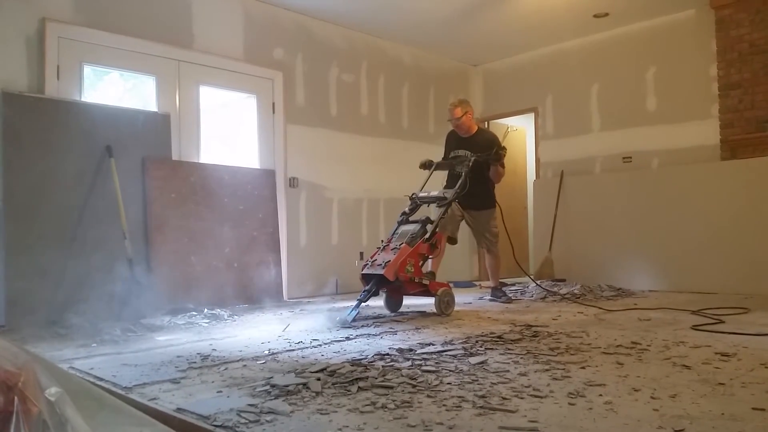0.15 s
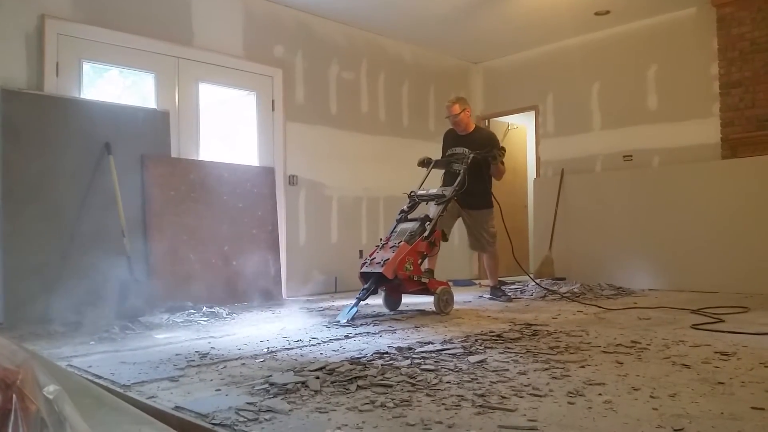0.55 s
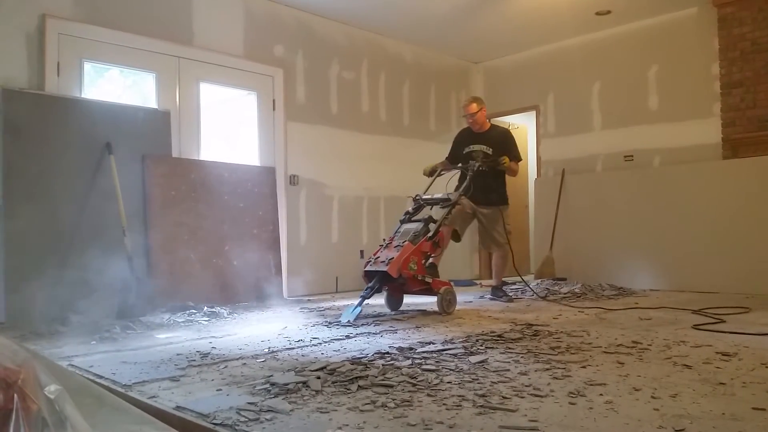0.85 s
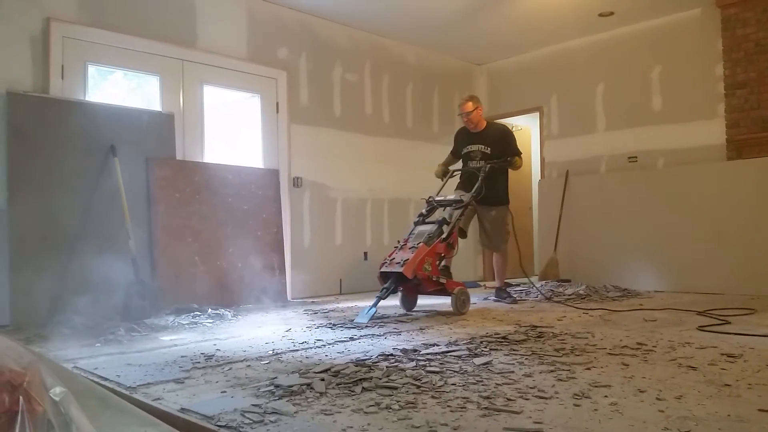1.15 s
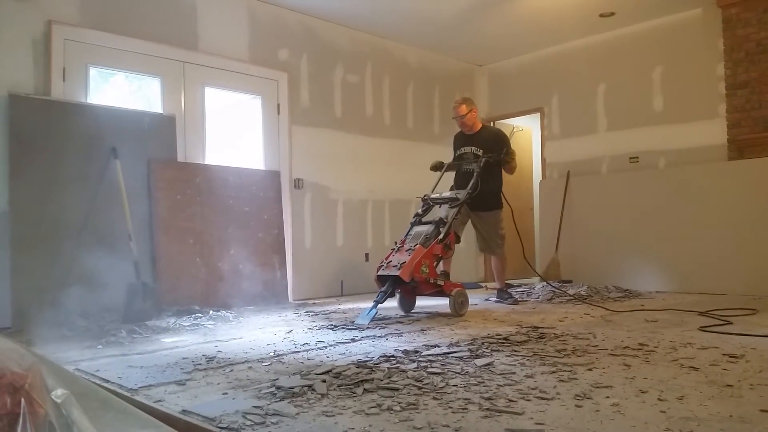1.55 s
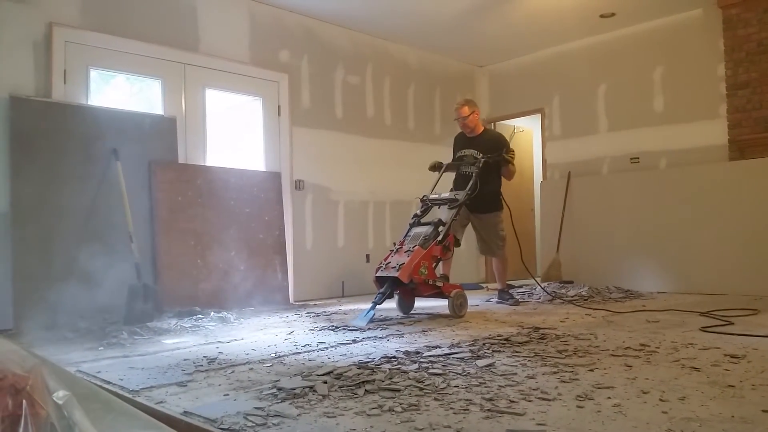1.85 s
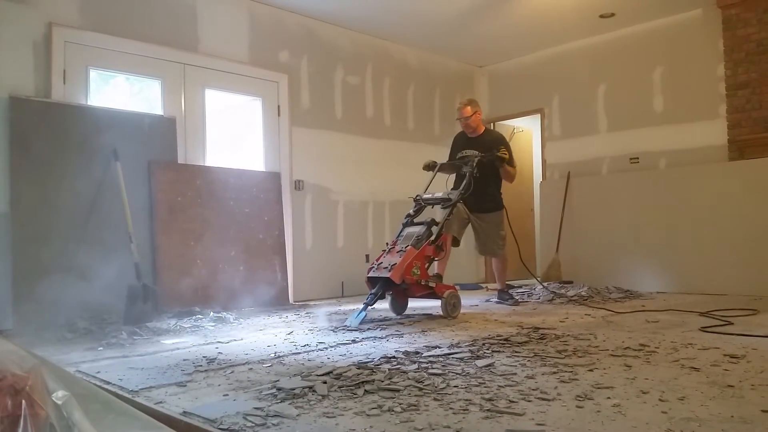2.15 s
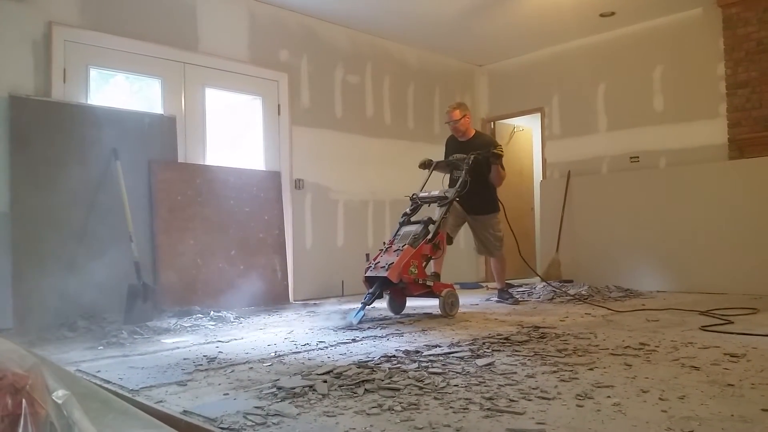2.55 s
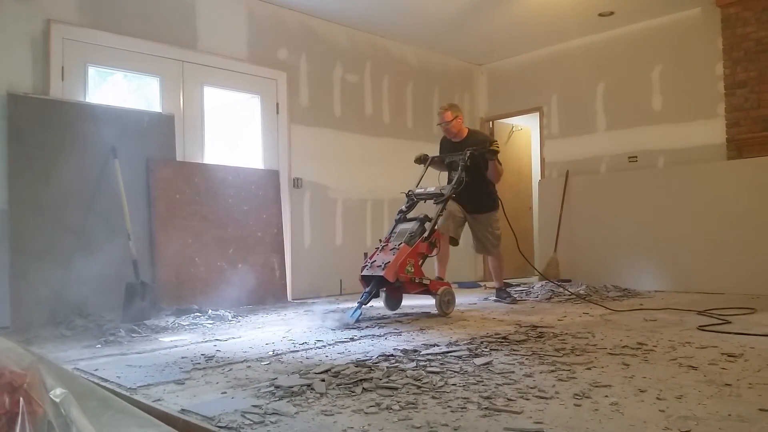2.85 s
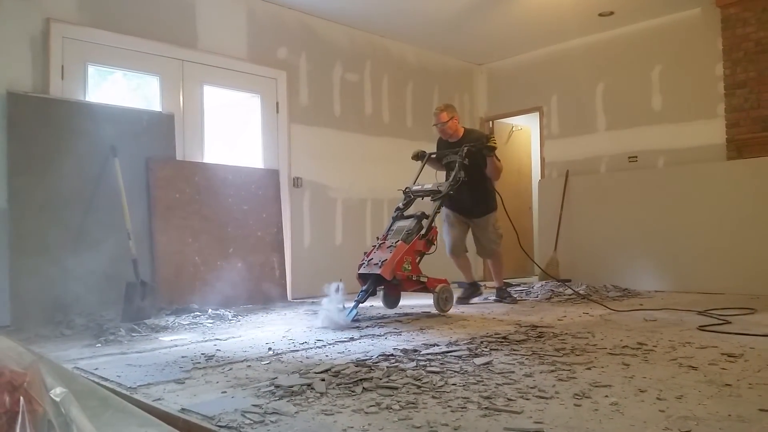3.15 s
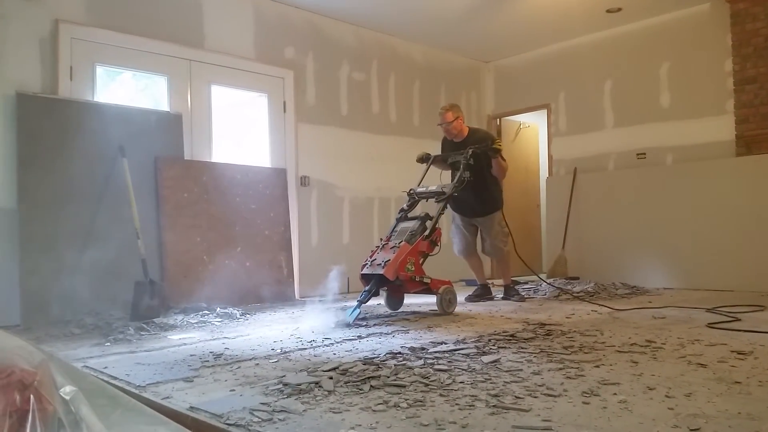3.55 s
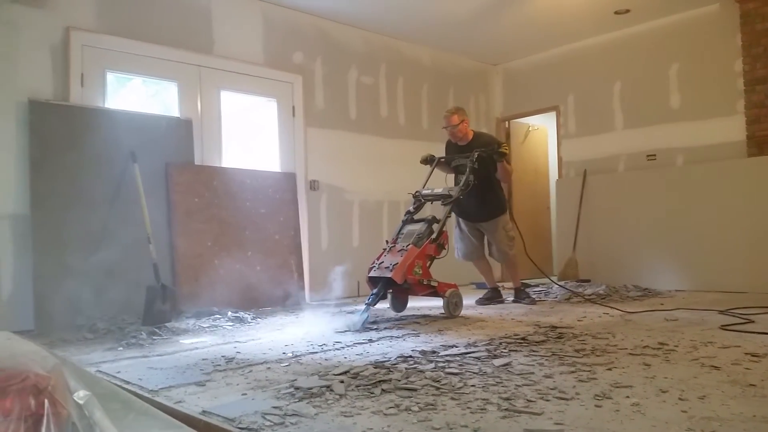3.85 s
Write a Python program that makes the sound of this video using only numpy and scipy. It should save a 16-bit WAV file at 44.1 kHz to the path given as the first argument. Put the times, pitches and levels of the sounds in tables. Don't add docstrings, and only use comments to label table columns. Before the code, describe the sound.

Electric floor stripper hammers a ringing steel blade under tile, pauses briefly, then bites again indoors.

```python
import sys
import numpy as np
from scipy import signal
from scipy.fft import rfft, irfft, next_fast_len
from scipy.io import wavfile
from scipy.ndimage import uniform_filter1d

SR = 44100
rng = np.random.default_rng(int(sys.argv[2]) if len(sys.argv) > 2 else 0)


def int16_out(signal):
    q = np.round(np.clip(np.atleast_2d(signal).T, -1, 1) * 32767)
    wavfile.write(sys.argv[1], SR, q.astype(np.int16))


def voltage_ratio(level):
    return 10 ** (np.asarray(level, float) / 20)


N = 176400
T = np.arange(N) / SR

# [f/Hz, t60/s]
ROOM_DECAY = [(100, 1), (500, 0.87), (2000, 0.9), (6000, 1), (14000, 0.34)]
# [f/Hz, left over right/dB]
MIC_LEAN = [(60, 0), (250, 0), (1000, 0), (2000, -0.5), (4500, 6.5), (7000, 6), (10000, -3.5),
            (14000, -3.5)]
# [f/Hz, share alike]
EAR_LIKENESS = [(30, .4), (70, .7), (150, .8), (300, .7), (600, .55), (1100, -.1), (2000, .1), (5000, 0)]

# [t/s, level/dB]
MOTOR_LEVEL = [(0, -26), (.55, -30.5), (.88, -28), (1.15, -29), (1.5, -24.5), (4, -24)]
# [f/Hz, level per Hz/dB]
MOTOR_HISS = [(200, -17.5), (600, -0.5), (2300, 0), (3200, -5.5), (8400, -10.5), (9500, -0.5), (12300, 0),
              (14000, -19)]
# [f/Hz, width/Hz, level/dB]
CASE_HUM = [(258, 16, -24), (130, 80, -31), (60, 5, -36)]
# [t/s, f/Hz, level/dB]
GEAR_WHINE = [(0, 3100, -60), (.4, 3250, -50), (.55, 3520, -44), (.72, 3760, -47), (.88, 3890, -45.5),
              (1.05, 3620, -45), (1.2, 3350, -46), (1.33, 3150, -47), (1.5, 3000, -55), (1.68, 3350, -40),
              (1.8, 3300, -50)]
# [start t/s, length/s, f/Hz, wander/Hz,
# level/dB]
FRICTION_SINGS = [(.03, .045, 11405, 35, -12.5), (.088, .04, 11405, 35, -16), (.14, .05, 11405, 35, -21),
                  (.1, .025, 11770, 45, -14), (1.962, .03, 10305, 30, -16), (2.006, .035, 10305, 30, -10.5),
                  (2.077, .08, 10285, 18, -14), (2.11, .022, 10285, 18, -13.5), (1.3, .12, 770, 30, -41),
                  (1.47, .28, 745, 55, -37), (1.48, .2, 810, 55, -39), (2.78, .3, 464, 4, -35.5),
                  (3.65, .3, 464, 4, -41), (2.5, .65, 6045, 45, -31), (2.8, .38, 2290, 60, -31),
                  (2.35, 1.6, 1444, 14, -42), (2.9, 1.1, 1604, 14, -42), (1.3, .36, 60, 1, -54),
                  (3.62, .26, 2290, 60, -34), (2.33, .12, 2195, 25, -34), (3.72, .15, 2195, 25, -36),
                  (2.5, .26, 10290, 45, -23), (3.02, .13, 10290, 45, -20), (3.72, .28, 10290, 45, -24)]
# [t/s, level/dB, f/Hz]
FLOOR_KNOCKS = [(2.013, -23, 125), (2.015, -23, 290), (2.017, -20, 440), (2.0185, -22, 530),
                (2.0195, -24, 720), (2.013, -21, 800), (2.017, -26, 200), (2.024, -25, 310),
                (2.032, -26, 330), (2.042, -26, 480), (2.016, -30, 45), (2.027, -25, 1100),
                (2.003, -22, 1950), (2.009, -21, 2250), (2.014, -24, 2500), (2.028, -20, 2150),
                (.995, -47, 70), (1.165, -50, 80), (3.03, -40, 45), (.33, -43, 125), (.4, -45, 125),
                (.46, -47, 150), (2.1, -41, 140)]

# [t/s, blows counted so far]
CRANK_TURNS = [(0.034, 1), (0.5, 12), (1.6018, 38), (1.6742, 40), (2.2184, 53), (2.2982, 55), (2.4309, 58),
               (2.7273, 64), (2.8714, 67), (3.966, 89), (4.016, 90)]
# [t/s, blow on the steel/dB, bite into the slab/dB]
HAMMER_EFFORT = [(.06, -14, -28), (.24, -13, -28), (.36, -25.5, -37.5), (.45, -59, -61), (.55, -33, -55),
                 (1.35, -37.5, -35.5), (1.6, -19.5, -26.5), (1.64, -23, -20), (1.672, -14, -31.5),
                 (1.9, -14.5, -28.5), (2.0, -9, -29), (2.09, -25.5, -47), (2.18, -35, -103),
                 (2.218, -13, -32), (2.32, -10.5, -24), (3.1, -11.5, -26.5), (3.4, -12.5, -27),
                 (4, -11.5, -24.5)]
# [f/Hz, width/Hz, level/dB]
THUD_MODES = [(100, 18, -8), (122, 12, -3), (162, 20, -3), (202, 18, -3), (222, 14, -3), (262, 14, -1),
              (318, 34, 0)]
# [f/Hz, level per Hz/dB]
CRACK_COLOUR = [(900, -10), (2200, -3), (3300, -12), (4300, 0), (7000, -4), (11000, -4), (15000, -12)]
# [f/Hz, width/Hz, level/dB]
BLADE_MODES = [(4130, 300, -14), (4780, 130, -11), (5200, 250, -15), (5560, 110, -9), (6045, 65, -4),
               (7090, 250, -10.5), (8020, 130, -9), (9340, 130, -8), (9825, 55, -1), (10295, 110, 1),
               (11390, 60, -3), (11890, 120, -5), (12705, 66, -7), (14465, 140, -8)]
# [f/Hz, level per Hz/dB]
CHATTER_COLOUR = [(2800, -14), (3500, -19), (4500, -21), (6600, -19.5), (7650, -23), (8700, -15.5),
                  (10600, -4), (15700, -13.5)]
# [f/Hz, level per Hz/dB]
SLAB_COLOUR = [(70, -25), (110, -30), (220, -4), (400, -10), (1000, -7), (2250, -0.5), (3300, -21),
               (4000, -43)]
# [f/Hz, width/Hz, level/dB]
FRAME_MODES = [(490, 29, 6), (734, 30, -12), (1437, 40, 6), (1530, 22, 6), (2180, 52, -19), (2330, 95, 2)]


def evened(x):
    return x / np.sqrt(np.mean(x ** 2) + 1e-20)


def read(points, hz):
    f, value = np.transpose(points)
    return np.interp(np.log(hz + 1), np.log(f + 1), value)


def curve(table, column):
    return np.interp(T, [row[0] for row in table], [row[column] for row in table])


def colour(x, points):
    hz = np.fft.rfftfreq(x.shape[-1], 1 / SR)
    octaves_below = np.maximum(np.log2(points[0][0] / (hz + 1)), 0)
    octaves_above = np.maximum(np.log2((hz + 1) / points[-1][0]), 0)
    gain_db = read(points, hz) - 20 * (octaves_below + octaves_above)
    return irfft(rfft(x) * voltage_ratio(gain_db), x.shape[-1])


def resonate(x, hz, width):
    turn = np.exp(2j * np.pi * np.cumsum(hz * np.ones(len(x))) / SR)
    r = np.exp(-np.pi * width / SR)
    return 2 * (turn * signal.lfilter([1 - r], [1, -r], x / turn + 1e-18)).real


def wander(hz, wander_hz):
    flutter_db = 2.2 * np.minimum(wander_hz / 30, 1)
    drift, flutter = [evened(uniform_filter1d(v, size=220)) for v in rng.standard_normal((2, N))]
    turns = np.cumsum(hz + wander_hz * drift) / SR
    ear_turn = np.array([[0], [1 / 4]])
    return np.sqrt(2) * voltage_ratio(flutter_db * flutter) * np.sin(2 * np.pi * (turns + ear_turn))


def paths(count):
    near_t60_s, far_gap_s, far_db = .015, .006, 5.5
    t = np.arange(SR // 2) / SR
    near, far = rng.standard_normal((2, count, 2, len(t)))
    near *= voltage_ratio(-60 * t / near_t60_s)
    hz, frame_s, bands = signal.stft(far * (t > far_gap_s), SR, nperseg=512)
    t60 = read(ROOM_DECAY, hz)[:, None]
    dying = bands * voltage_ratio(-60 * frame_s / t60) / np.sqrt(t60)
    far = signal.istft(dying, SR, nperseg=512)[1][..., :len(t)]
    return evened(near) + voltage_ratio(far_db) * evened(far)


def room(x, count=7):
    sway_s = .045
    lead = SR // 2
    x = np.concatenate([x[lead:0:-1], x])
    size = next_fast_len(len(x) + lead)
    step = np.arange(len(x)) / SR / sway_s
    offset = (step - np.arange(count)[:, None] + count / 2) % count - count / 2
    share = np.cos(np.pi / 2 * np.minimum(abs(offset), 1))
    h = paths(count)
    z = (rfft(share * x, size)[:, None] * rfft(h, size)).sum(0)
    z /= np.sqrt(np.mean((h ** 2).sum(-1)))
    same = np.clip(read(EAR_LIKENESS, np.fft.rfftfreq(size, 1 / SR)), -1, 1)
    right = same * z[0] + np.sqrt(1 - same ** 2) * z[1]
    return irfft(np.array([z[0], right]), size)[:, lead:lead + N]


def motor():
    air, shake = rng.standard_normal((2, N))
    hum = sum(voltage_ratio(db) * evened(resonate(shake, hz, width)) for hz, width, db in CASE_HUM)
    return voltage_ratio(curve(MOTOR_LEVEL, 1)) * (evened(colour(air, MOTOR_HISS)) + hum)


def sings():
    rise_s, fall_s = .01, .024
    out = voltage_ratio(curve(GEAR_WHINE, 2) + .3) * wander(curve(GEAR_WHINE, 1), wander_hz=38)
    modes = {row[2]: wander(row[2], row[3]) for row in FRICTION_SINGS}
    for start, length, hz, _, db in FRICTION_SINGS:
        rise = np.clip((T - start) / rise_s, 0, 1)
        fall = np.exp(-np.maximum(T - start - length, 0) / fall_s)
        out += voltage_ratio(db) * rise * fall * modes[hz]
    return out


def knocks():
    swell_s, knee_hz = .007, 500
    out = np.zeros(N)
    for start, db, hz in FLOOR_KNOCKS:
        since = np.maximum(T - start, 0)
        age = since / swell_s * (1 + hz / knee_hz)
        out += voltage_ratio(db) * np.e * age * np.exp(-age) * np.sin(2 * np.pi * hz * since)
    return out


def blows():
    times = [-.008] + [row[0] for row in CRANK_TURNS]
    counts = [0] + [row[1] for row in CRANK_TURNS]
    index = np.interp(T, times, counts).astype(int)
    return index, np.searchsorted(index, index)


def thud():
    luck_db, slip_s, spread_s = 1.5, .0018, .011
    index, _ = blows()
    hits = np.flatnonzero(np.diff(index, prepend=0))
    count = len(THUD_MODES)
    size, slip = rng.standard_normal((100, count)), rng.random((100, count))
    late = (rng.random((2, count)) * [[1], [.2]]).cumsum(0) * spread_s * SR
    parts = []
    for k, (hz, width, db) in enumerate(THUD_MODES):
        kicks = np.zeros(N + SR)
        slipped = (slip[index[hits], k] ** 2 * slip_s * SR).astype(int)
        kicks[hits + slipped] = voltage_ratio(luck_db * size[index[hits], k])
        jolt = resonate(resonate(kicks[:N], hz, width), hz, 4 * width)
        parts.append(voltage_ratio(db) * evened(jolt))
    weakness_db = .8 * np.minimum(curve(HAMMER_EFFORT, 1) + 10, 0)
    level_db = curve(HAMMER_EFFORT, 2) - 15 + weakness_db
    ears = [sum(np.roll(p, round(d)) for p, d in zip(parts, ear)) for ear in late]
    return voltage_ratio(level_db) * np.array(ears)


def cracks():
    snap_s, luck_db, level_db = .003, 2.5, -6
    index, began = blows()
    luck = voltage_ratio(luck_db * rng.standard_normal(100))
    snap = np.exp(-(T - T[began]) / snap_s) * luck[index]
    noise = colour(snap * rng.standard_normal((2, N)), CRACK_COLOUR)
    return voltage_ratio(curve(HAMMER_EFFORT, 1)[began] + level_db) * evened(noise)


def hammer():
    strike_db, strike_s, chatter_s = 7.5, .0095, .042
    blow_luck_db, ring_luck_db, slab_steady = -1, 2.2, .45
    ring_db, frame_db = -2, -10.5
    chips_per_s, chips_db = 130, -19
    index, began = blows()
    since = T - T[began]
    luck = rng.standard_normal((100, 24))
    shape = voltage_ratio(strike_db) * np.exp(-since / strike_s) + np.exp(-(since / chatter_s) ** 2)
    shape = evened(shape * voltage_ratio(blow_luck_db * luck[index, 0]))
    on_steel, on_slab = rng.standard_normal((2, N)) * [shape, shape + slab_steady]

    ring = np.zeros(N)
    for k, (hz, width, db) in enumerate(BLADE_MODES):
        share = voltage_ratio(db + ring_luck_db * luck[index, 1 + k])
        ring += share * evened(resonate(on_steel, hz, width)) * np.sqrt(width)
    chip_size = voltage_ratio(2.3 * np.minimum(rng.exponential(1, N), 5))
    chips = chip_size * (rng.random(N) < chips_per_s / SR)
    chatter = colour(on_steel + voltage_ratio(chips_db) * evened(chips), CHATTER_COLOUR)
    steel = evened(chatter) + voltage_ratio(ring_db) * evened(ring)

    frame = np.zeros(N)
    for hz, width, db in FRAME_MODES:
        frame += voltage_ratio(db) * evened(resonate(on_slab, hz, width)) * np.sqrt(width)
    slab = evened(colour(on_slab, SLAB_COLOUR)) + voltage_ratio(frame_db) * evened(frame)
    steel_level = voltage_ratio(curve(HAMMER_EFFORT, 1)[began])
    return steel_level * evened(steel) + voltage_ratio(curve(HAMMER_EFFORT, 2)) * evened(slab)


def scene():
    song, jolt = sings(), thud()
    wet = room(hammer() + motor() + voltage_ratio(-9) * song[0] + voltage_ratio(-4) * jolt[0])
    stand = knocks() * voltage_ratio([[-1], [1]])
    return wet + song + jolt + stand + voltage_ratio(-8) * cracks()


def band_limit(x):
    return signal.sosfilt(signal.butter(12, 15750, fs=SR, output="sos"), x)


def record(dry):
    low_cut_hz, ceiling = 46, .9
    hz = np.fft.rfftfreq(N, 1 / SR)
    lean = voltage_ratio(read(MIC_LEAN, hz) * np.array([[.5], [-.5]]))
    bass_cut = hz ** 2 / (hz ** 2 + low_cut_hz ** 2)
    heard = irfft(rfft(dry) * lean * bass_cut, N)
    return band_limit(np.clip(heard, -ceiling, ceiling))


dry = scene()
out = record(dry)
int16_out(out)
```